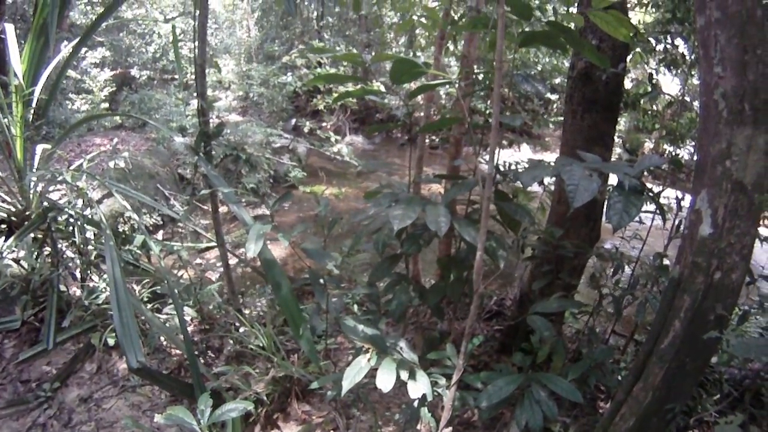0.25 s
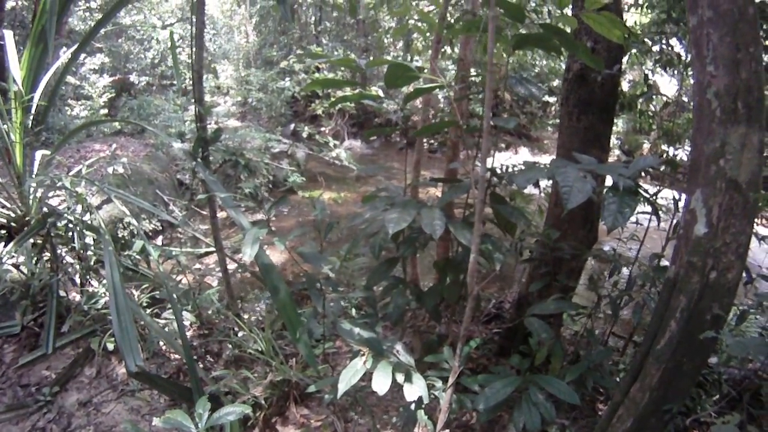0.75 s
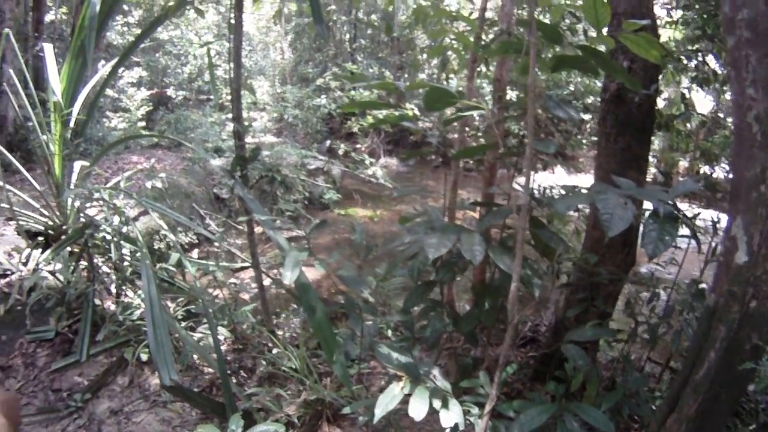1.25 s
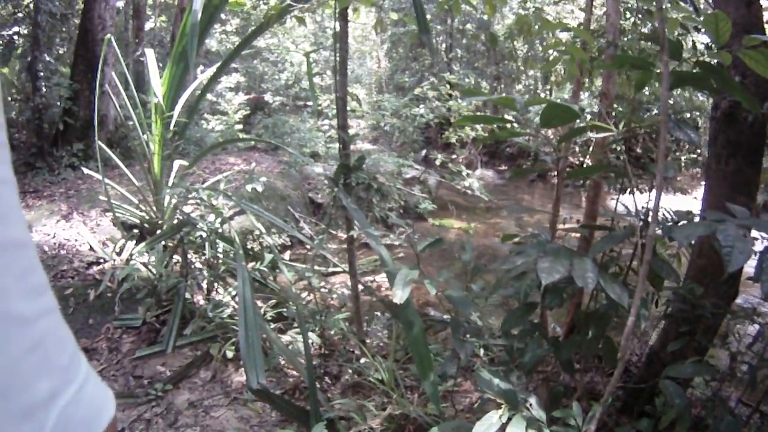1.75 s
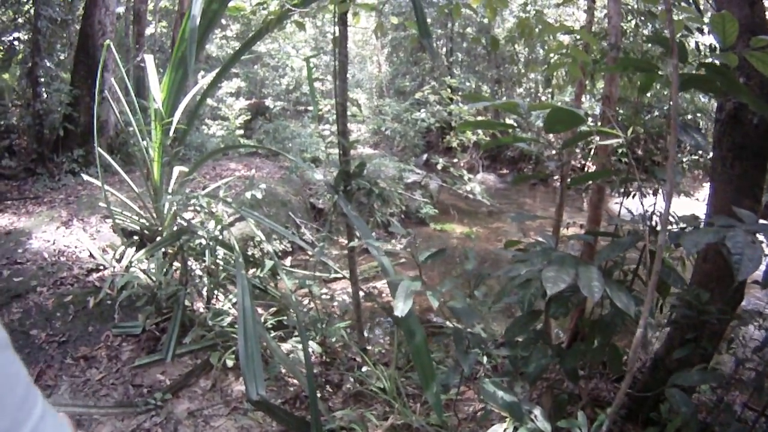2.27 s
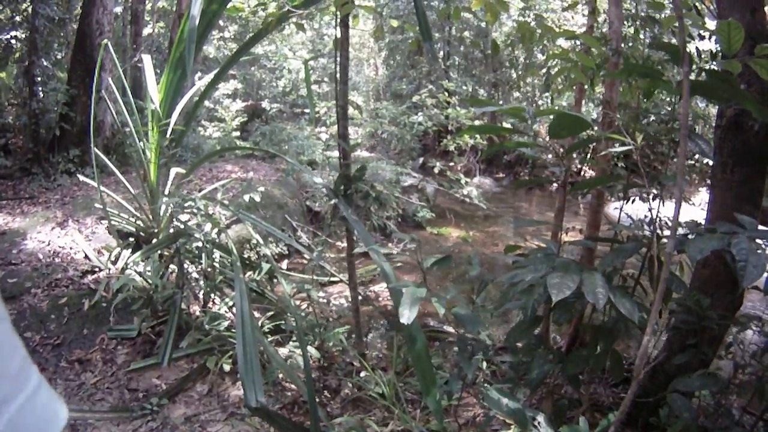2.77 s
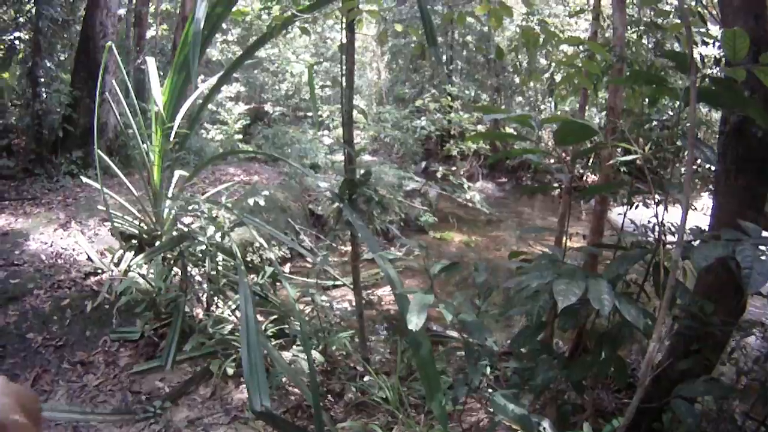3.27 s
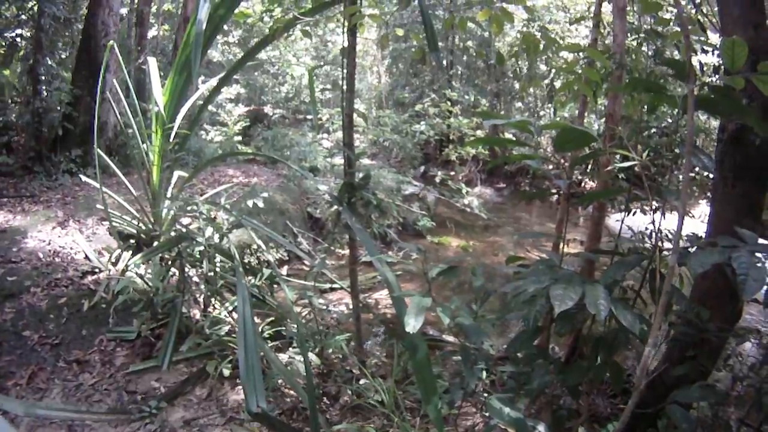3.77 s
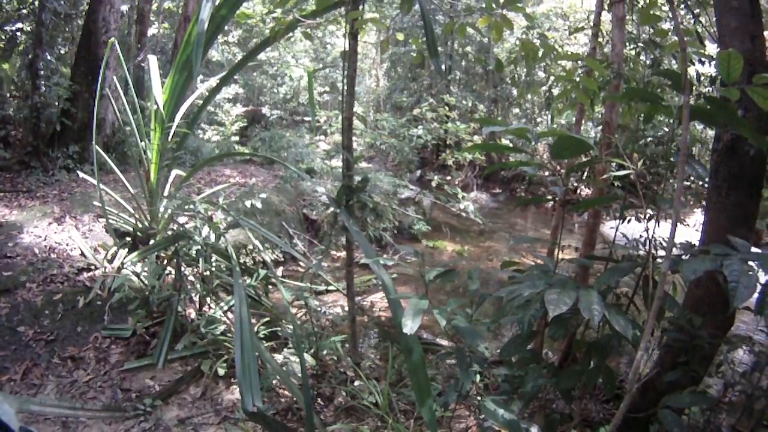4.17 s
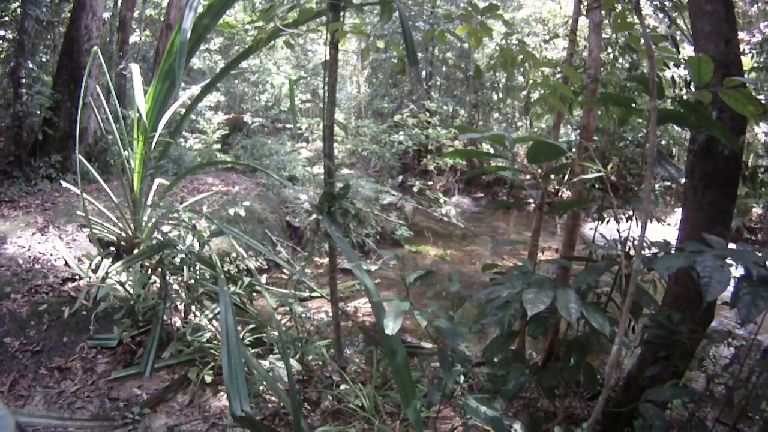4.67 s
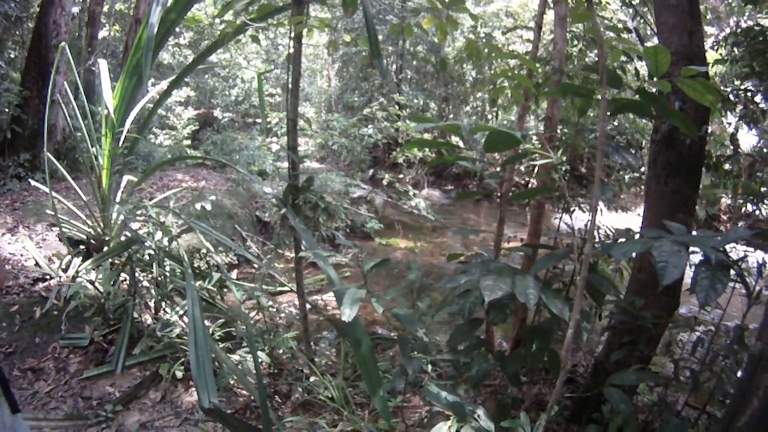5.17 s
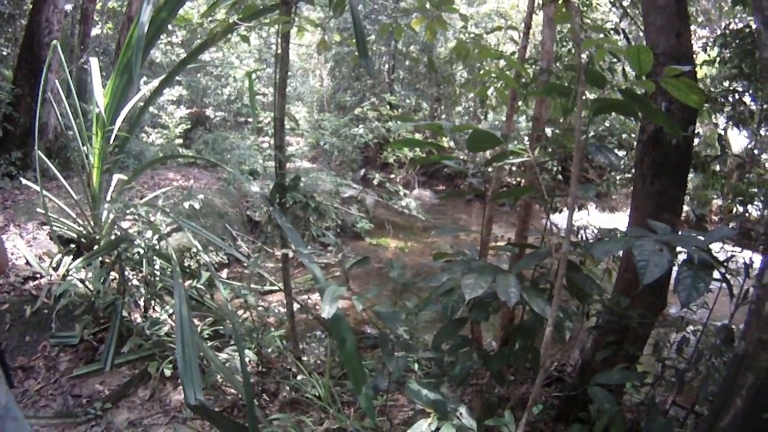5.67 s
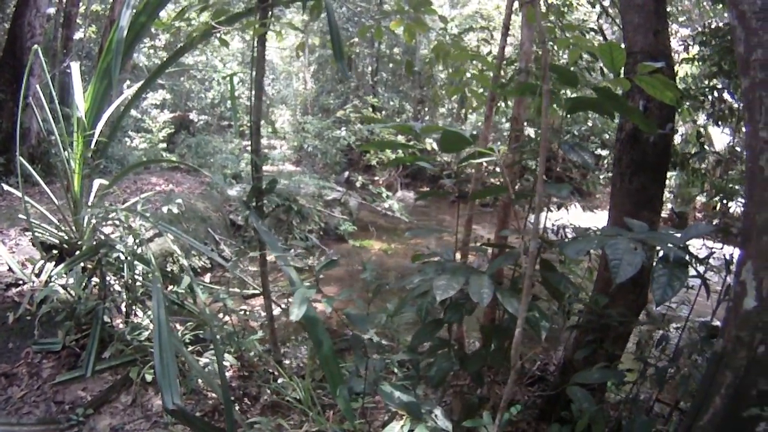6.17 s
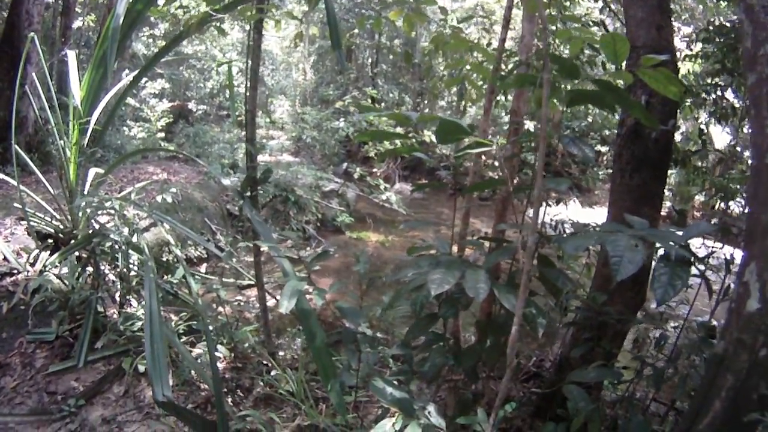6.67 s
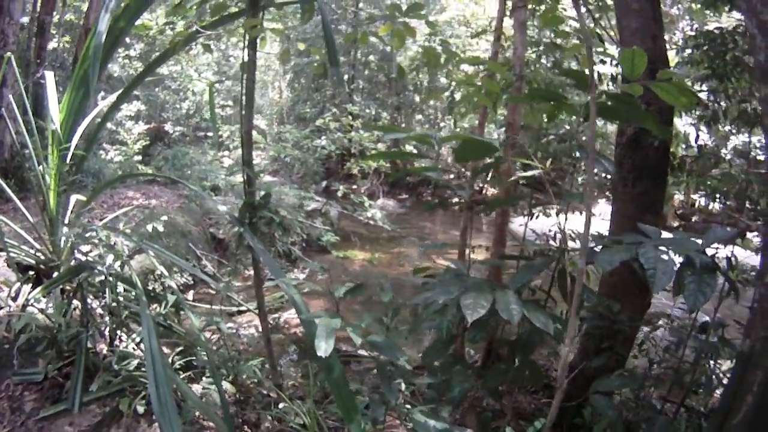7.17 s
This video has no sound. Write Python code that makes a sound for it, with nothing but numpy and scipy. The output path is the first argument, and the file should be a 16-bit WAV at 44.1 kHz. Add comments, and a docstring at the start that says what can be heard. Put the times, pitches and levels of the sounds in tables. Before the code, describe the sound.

Rainforest cicadas chirr in a steady high chorus while nearer ones buzz sinking phrases, over a faint stream murmur and soft low wind bumps.

```python
"""Cicadas in a rainforest

A far chorus chirrs in three bands of click-flecked noise; near and fainter singers buzz phrases whose
click rate sinks, built from the overtones that ring in a drum organ. Soft peeps and dull ticks are short tones.
A stream murmurs as patchy noise, and a light wind rumbles and bumps on the microphone.
The camera holds each value for 1/12000 s, which mirrors the chorus into the treble."""
import sys
import numpy as np
from scipy import signal
from scipy.fft import rfft, irfft, next_fast_len
from scipy.io import wavfile
from scipy.ndimage import uniform_filter1d

SR = 44100
rng = np.random.default_rng(int(sys.argv[2]) if len(sys.argv) > 2 else 0)


def digitize_waveform(pressure):
    """Quantize a signal to 16-bit integers and store it at the path in sys.argv[1].

    Rows of a 2-D input are taken as channels; values are limited to [-1, 1].
    """
    field = np.atleast_2d(pressure).T
    bounded = np.clip(field, -1, 1)
    quanta = np.round(bounded * 32767).astype(np.int16)
    wavfile.write(sys.argv[1], SR, quanta)


N = 327663  # length in samples

# Loudness of the far chorus, before band offsets and swells. Each row: time in seconds, level in dB.
CHORUS_LEVEL = [(0.0, -52), (0.7, -52), (1.59, -52), (2.29, -53.5), (2.5, -52), (2.92, -54), (3.6, -52.5),
                (4.2, -52), (4.8, -51.5), (5.6, -53), (6.0, -53.5), (7.2, -51), (7.43, -51.5)]
# What the far bodies ring with, band by band. Each row: frequency in Hz, relative level per Hz in dB.
LOW_BODY = [(1090, -57), (1850, -16), (2000, -7.5), (2120, -0.5), (2330, 1), (2480, -4), (2570, -1),
            (2690, -10.5), (2790, -3.5), (2880, -8), (3200, -36), (5000, -120)]
MIDDLE_BODY = [(1710, -44.5), (2870, -17.5), (3000, -6), (3080, -8), (3220, -6.5), (3360, -10),
               (3520, -4.5), (3720, 0), (3900, -4.5), (4200, -9.5), (5460, -22), (9240, -120)]
HIGH_BODY = [(2480, -40.5), (4220, -2), (4400, 0), (4620, 3), (4800, -1.5), (4960, -2), (5150, -5),
             (5500, -17), (6000, -24), (13200, -120)]
LOW_DB, HIGH_DB = -7, -3  # outer bands against the middle one
SWELL_DB = 0.74  # spread of the chance swells of each band

# Colour of the stream. Each row: frequency in Hz, relative level per Hz in dB.
STREAM_COLOUR = [(59, -24), (100, -1.5), (119, -3.5), (218, -9), (911, -17.5), (1090, -16.5), (1270, -19.5),
                 (1470, -19.5), (1600, -14.5), (1850, -22), (2400, -50), (4070, -120)]
STREAM_DB = -61.5  # rms level

# Strength of the wind rumble, before its random wobble. Each row: time in seconds, rms level in dB.
WIND_LEVEL = [(0.0, -57.5), (0.85, -56.5), (1.03, -59), (1.2, -54), (1.57, -54), (1.75, -56.5), (2.77, -58),
              (3.23, -60.5), (3.43, -58), (4.3, -56.5), (4.65, -60), (6.3, -58), (6.75, -52.5), (7.1, -54),
              (7.43, -49.5)]
# Colour of the wind rumble. Each row: frequency in Hz, relative level per Hz in dB.
RUMBLE_COLOUR = [(8.8, -37), (15, -6.5), (65, 0.5), (83, -1.5), (120, -28), (160, -50), (260, -120)]
# Buffets on the microphone. Each row: time of the envelope peak in seconds, its level in dB, swing rate in Hz.
BUFFETS = [(0.537, -40.6, 71.4), (1.279, -51, 55.6), (1.403, -38.0, 63.4), (1.445, -44.9, 54),
           (1.476, -44, 69), (1.506, -39, 63), (1.537, -46, 59), (1.682, -40, 63), (1.956, -41, 70),
           (2.063, -47, 57), (2.089, -44, 59), (2.219, -44, 66), (3.463, -42.5, 63), (3.614, -43.5, 76.4),
           (4.028, -45, 55.3), (4.192, -43, 70), (4.611, -41.5, 70), (5.214, -43, 75.5), (5.817, -38, 63.5),
           (6.385, -44, 67), (6.433, -40.5, 59), (6.582, -43.5, 57), (6.615, -46, 51.7), (6.859, -43.5, 70),
           (7.045, -41.5, 69), (7.268, -43.5, 64.4), (7.363, -45, 67.4)]

# Drum organ of the fainter singers. Each row: resonance in Hz, width in Hz.
FAR_DRUM = [(3720, 560), (4580, 640)]

# Drum organs of the four near singers, two resonances each. Each pair: resonance in Hz, width in Hz.
NEAR_DRUMS = [
    [(3900, 700), (4850, 600)],
    [(3680, 600), (4600, 700)],
    [(3900, 600), (4860, 560)],
    [(4150, 600), (5050, 460)],
]
# One phrase of each near singer. Each row: start in seconds, end in seconds, first click rate in Hz,
# share of the rate lost per second.
NEAR_PHRASES = [(0.1, 2.35, 304.8, .047), (2.45, 6.7, 314, .0512), (4.9, 7.43, 321.5, .049),
                (5.9, 7.43, 335.5, .046)]
# How loud each phrase is sung, one list per singer, before leaf fades. Each row: time in seconds,
# level of the lower resonance in dB, level of the upper resonance in dB.
NEAR_EFFORTS = [
    [(0.1, -71, -68), (0.55, -54, -59.5), (1.0, -60, -63.5), (1.4, -65, -62), (1.8, -69, -60.5),
     (2.2, -54, -65), (2.35, -61, -63)],
    [(2.45, -65, -70), (2.7, -59, -61), (3.2, -53.5, -59), (3.6, -58, -70), (3.8, -56, -62),
     (4.1, -64, -76), (4.8, -70, -67), (5.2, -59, -59.5), (5.9, -57, -59), (6.7, -58, -64)],
    [(4.9, -74, -72), (5.4, -67, -59.5), (5.9, -63, -60), (6.3, -63, -57), (6.8, -71, -61),
     (7.43, -74, -57)],
    [(5.9, -61, -68), (6.3, -58, -60.5), (6.9, -56, -65), (7.43, -62, -64)],
]
LEAF_FADE_DB, LEAF_FADES_PER_S = 3, 12  # moving leaves make each resonance come and go

# Short soft peeps of a frog or cricket. Each row: start in seconds, length in seconds, middle pitch in Hz,
# peak level in dB.
PEEP_NOTES = [(0.199, .08, 3060, -57), (2.29, 0.045, 2390, -60), (4.745, .08, 3020, -60),
              (4.827, 0.03, 2985, -50), (4.877, 0.032, 2350, -54), (5.772, 0.066, 2995, -58),
              (5.843, .045, 2300, -54), (7.07, .07, 3010, -60), (7.228, 0.06, 3010, -57),
              (7.348, 0.025, 3020, -55)]
# Single dull ticks close by. Each row: start in seconds, level before the onset and decay in dB, pitch in Hz.
TICK_HITS = [(2.1819, -38, 2270), (2.6459, -47.5, 2270), (5.0579, -47, 2280), (6.4842, -40, 2140),
             (6.8962, -41, 2250), (7.1277, -41, 2180), (7.194, -37.5, 2360), (7.4145, -42, 2320)]
# The deeper opening of one phrase. Each row: time in seconds, click rate in Hz, level in dB.
DEEP_OPENING = [(2.34, 328, -78), (2.37, 325.5, -65), (2.43, 320.5, -60), (2.49, 316.5, -61),
                (2.51, 316, -78)]

# Colour of the hiss. Each row: frequency in Hz, relative level per Hz in dB.
HISS_COLOUR = [(30, -16), (70, -13), (130, -6.5), (300, 4), (1850, 2.5), (2050, -6), (2150, -27),
               (2700, -21.5), (3200, -28), (5000, -90)]
HOLD_HZ, STORE_HZ = 12000, 48000  # rate of fresh values, and rate at which they are repeated
TOP_HZ = 15390  # nothing passes above this


def amp(db):
    """dB to gain."""
    return 10 ** (np.asarray(db) / 20)


def unit(x):
    """Scaled to rms 1."""
    return x / np.sqrt(np.mean(x ** 2) + 1e-20)


def curves(rows):
    """One value per sample for each column after the time."""
    s, *columns = np.transpose(rows)
    return [np.interp(np.arange(N) / SR, s, column) for column in columns]


def wobble(rate, count=N):
    """A random curve of straight lines between knots, rate knots a second."""
    knots = rng.standard_normal(64 + int(N * rate // SR))
    return np.interp(np.arange(count) * rate / SR, np.arange(len(knots)), knots)


def filtered(x, response):
    """x times a response of frequency."""
    m = next_fast_len(N + 8192)
    spectrum = rfft(x, m) * response(np.fft.rfftfreq(m, 1 / SR))
    return irfft(spectrum, m)[..., :N]


def coloured(x, spectrum):
    """x through (Hz, dB) points on a log axis, rms 1."""
    f, db = np.transpose(spectrum)
    return unit(filtered(x, lambda hz: amp(np.interp(np.log(hz + 1), np.log(f + 1), db))))


def patchy(depth_db):
    """White noise with patches of random gain in time and pitch."""
    z = signal.stft(rng.standard_normal(N + 512), nperseg=512)[2]
    field = uniform_filter1d(rng.standard_normal(z.shape), size=4, axis=0)  # smooth over pitch
    field = uniform_filter1d(field, size=8, axis=1)  # smooth over time
    return signal.istft(z * amp(depth_db * unit(field)), nperseg=512)[1][:N]


def chorus():
    """Many far insects: their clicks blur into noise, with the nearest clicks still standing out."""
    out = np.zeros(N)
    level_db, = curves(CHORUS_LEVEL)
    bands = zip((LOW_DB, 0, HIGH_DB), (LOW_BODY, MIDDLE_BODY, HIGH_BODY), (-5, -18, -18))
    for band_db, body, click_db in bands:
        clicks = (rng.random(N) < 250 / SR) * rng.standard_normal(N)  # about 250 a second
        swell = amp(level_db + band_db + SWELL_DB * wobble(15))
        blur = unit(patchy(depth_db=0.55))
        out += swell * coloured(blur + amp(click_db) * unit(clicks), body)
    return out


def stream():
    """Water running over stones some way off: patchy noise in a fixed colour."""
    return amp(STREAM_DB) * coloured(patchy(depth_db=0.62), STREAM_COLOUR)


def wind():
    """A lumpy rumble, and single buffets that swing the membrane for a cycle or two."""
    level_db, = curves(WIND_LEVEL)
    rumble = amp(level_db + 1.5 * wobble(16)) * coloured(rng.standard_normal(N), RUMBLE_COLOUR)
    t = np.arange(-2200, 2200) / SR
    bumps = np.zeros(N + 2 * len(t))  # room for buffets that overhang either end
    for s, db, hz in BUFFETS:
        cycles = np.where(t < 0, .7, 1.1)  # rises faster than it falls
        envelope = np.exp(-(t * hz / cycles) ** 2)
        swing = envelope * np.cos(2 * np.pi * (hz * t + rng.random()))
        bumps[round(s * SR) + len(t) // 2:][:len(t)] += amp(db) * swing
    return rumble + bumps[len(t):][:N]


def buzz(rate_hz, body, levels_db, fade_db, orders):
    """Regular clicks in a resonant body; leaves on the way make each overtone fade in and out."""
    count = len(rate_hz)
    turns = np.cumsum(rate_hz) / SR + .002 * wobble(60, count)  # slightly uneven clicks
    sound, gains = 0, amp(levels_db)
    for k in orders:
        gain = 0
        for (hz, width), resonance_gain in zip(body, gains):
            gain = gain + resonance_gain / (1 + ((k * rate_hz - hz) / (width / 2)) ** 6)
        fade = amp(fade_db * wobble(7.56, count))
        sound += gain * fade * np.sin(2 * np.pi * (k * turns + rng.random()))
    return sound * signal.windows.tukey(count, .04)


def far_singers():
    """Fainter cicadas start similar sinking phrases at chance moments and throb several times a second."""
    out = np.zeros(N + 6 * SR)
    t = np.arange(5 * SR // 2) / SR
    for slot, (delay, pitch, beat) in enumerate(rng.random((7, 3))):
        start = round((slot + delay) * 1.3 * SR)  # one phrase per 1.3 s slot
        throb = amp(2.9 * np.sin(2 * np.pi * (6.6 * t + beat)))
        rate_hz = 300 + 35 * pitch - 14.5 * t
        phrase = buzz(rate_hz, FAR_DRUM, [-66, -65], fade_db=3, orders=range(10, 18))
        out[start:][:len(t)] += throb * phrase
    return out[2 * SR:][:N]  # the first slots begin 2 s before the scene


def singers():
    """Each near cicada clicks its drum organ in one long phrase whose rate sinks exponentially."""
    out = np.zeros(N)
    for (start, end, first_hz, sag), effort, body in zip(NEAR_PHRASES, NEAR_EFFORTS, NEAR_DRUMS):
        on = slice(round(start * SR), round(end * SR))
        rate_hz = first_hz * np.exp(-sag * (np.arange(N)[on] / SR - start))
        levels_db = np.array([db + LEAF_FADE_DB * wobble(LEAF_FADES_PER_S) for db in curves(effort)])
        out[on] += buzz(rate_hz, body, levels_db[:, on], fade_db=2, orders=range(10, 20))
    return out


def peeps():
    """Nearly pure notes that sag a little."""
    out = np.zeros(N)
    for s, length, hz, db in PEEP_NOTES:
        u = np.linspace(0, 1, round(length * SR))
        turns = np.cumsum(hz * (1 + 0.0076 * (.5 - u))) / SR
        envelope = np.sin(np.pi * u) ** 0.52
        out[round(s * SR):][:len(u)] += amp(db) * envelope * np.sin(2 * np.pi * turns)
    return out


def ticks():
    """Each tick has a rounded onset and rings briefly, losing 60 dB in 23 ms."""
    out, t = np.zeros(N + SR), np.arange(600) / SR
    for s, db, hz in TICK_HITS:
        envelope = amp(db - 60 * t / 0.023) * (1 - np.exp(-t / 0.0012))
        out[round(s * SR):][:len(t)] += envelope * np.sin(2 * np.pi * hz * t)
    return out[:N]


def deep_opening():
    """A brief buzz in one lower resonance opens a near phrase."""
    out = np.zeros(N)
    on = slice(round(DEEP_OPENING[0][0] * SR), round(DEEP_OPENING[-1][0] * SR))
    rate_hz, level_db = np.array(curves(DEEP_OPENING))[:, on]
    out[on] = buzz(rate_hz, [(2570, 560)], [level_db], fade_db=1, orders=range(6, 11))
    return out


def scene():
    """One microphone feeds both channels."""
    background = chorus() + stream() + wind()
    forest = background + far_singers() + singers() + peeps() + ticks() + deep_opening()
    return np.array([forest, forest])


def record(dry):
    """Sampling at the hold rate mirrors the band around it; repeating each value four times dulls the mirrors."""
    def hold(hz):
        return np.sinc(hz / HOLD_HZ) / np.sinc(hz / STORE_HZ)

    def flat(hz):  # the kept band comes out flat
        return (hz < HOLD_HZ / 2) / hold(np.minimum(hz, HOLD_HZ / 2))

    def top_cut(hz):
        return np.clip((TOP_HZ - hz) / 140, 0, 1) ** 2

    comb = 1 + 2 * np.cos(2 * np.pi * HOLD_HZ * np.arange(N) / SR)  # the band and its mirrors
    held = filtered(filtered(dry, flat) * comb, hold)
    hiss = amp(-83) * coloured(rng.standard_normal(N), HISS_COLOUR)
    return filtered(held + [[1], [-1]] * hiss, top_cut)  # faint hiss, opposite in the two channels


dry = scene()
out = record(dry)
digitize_waveform(out)
```